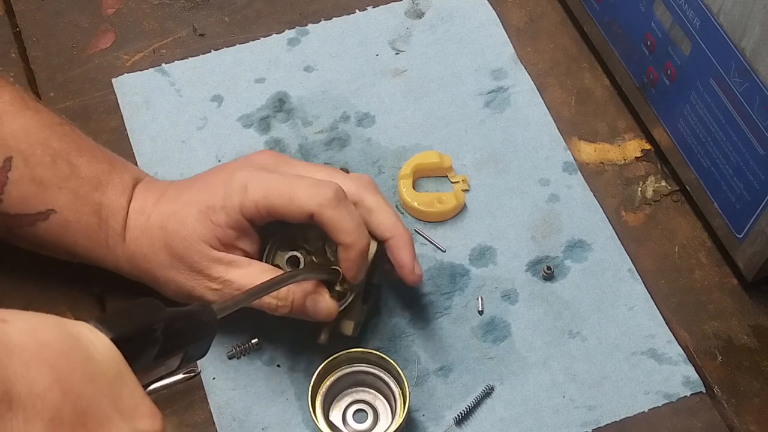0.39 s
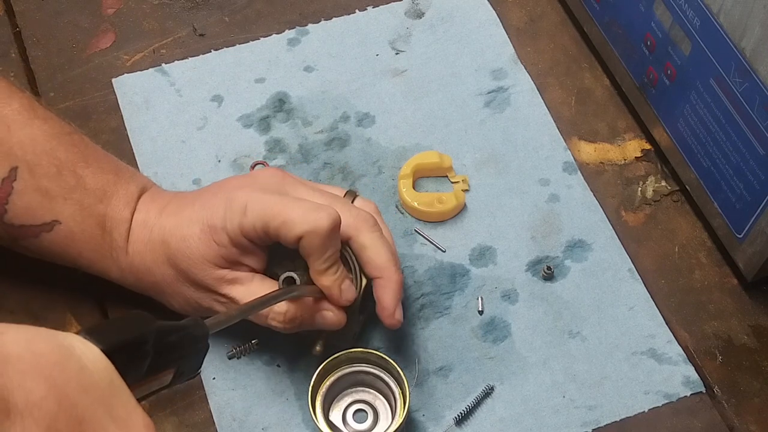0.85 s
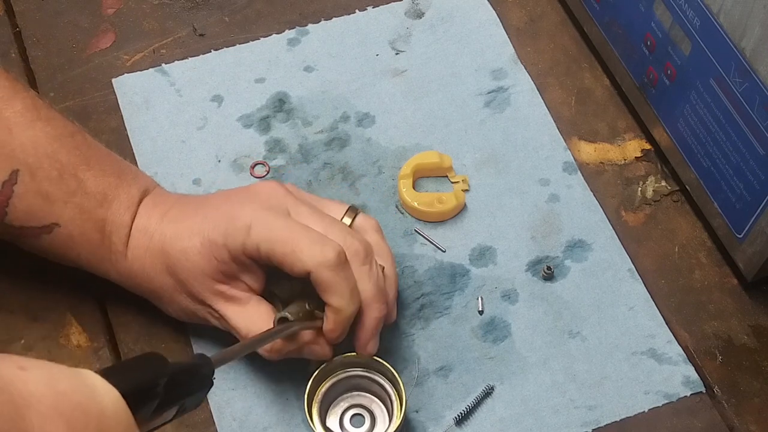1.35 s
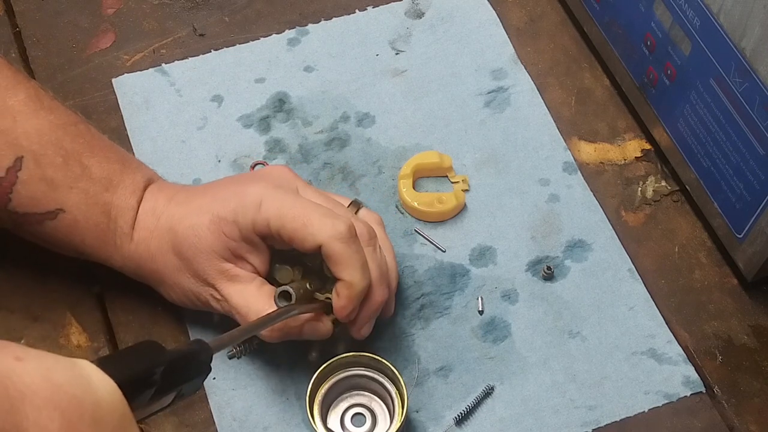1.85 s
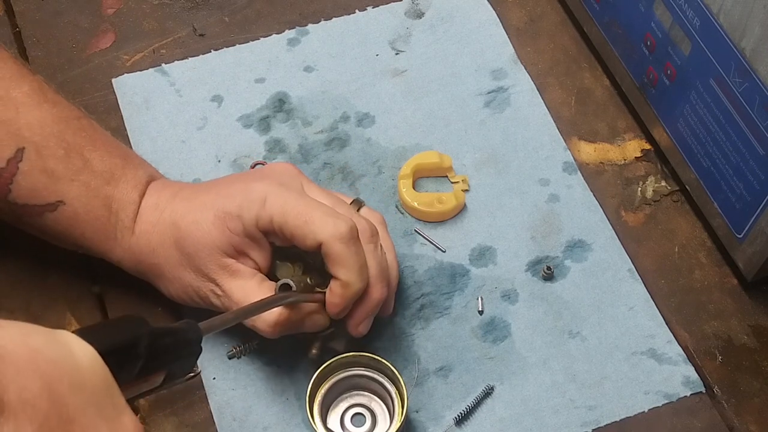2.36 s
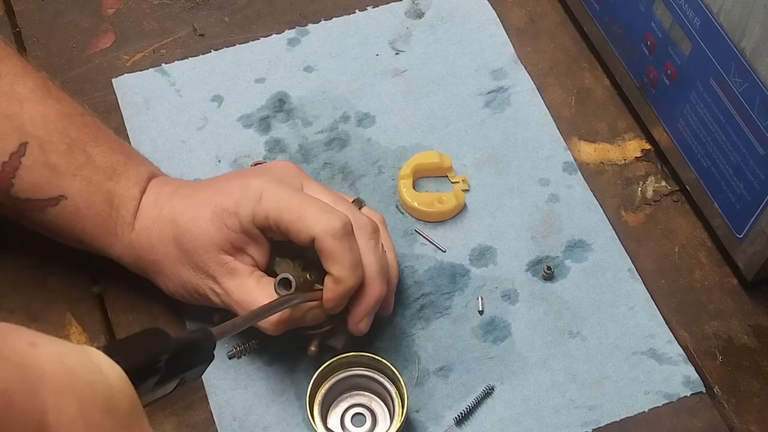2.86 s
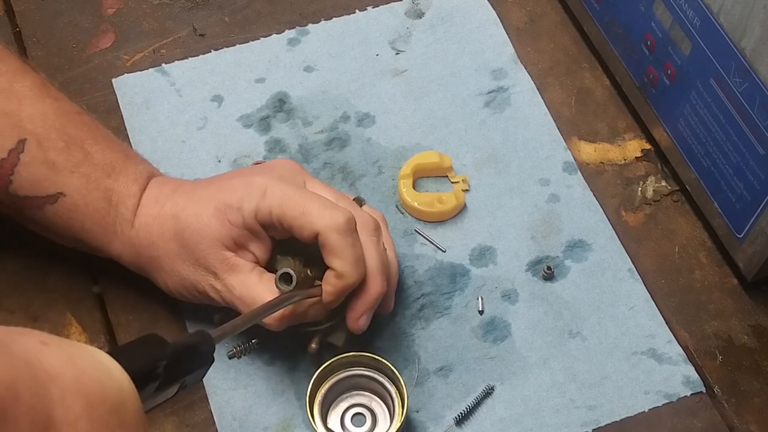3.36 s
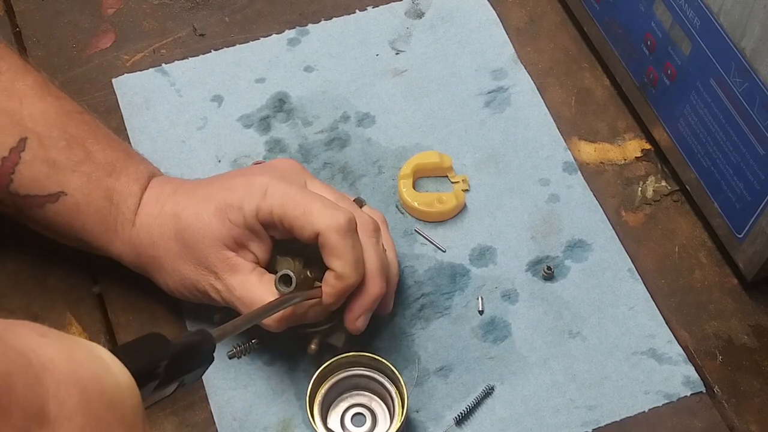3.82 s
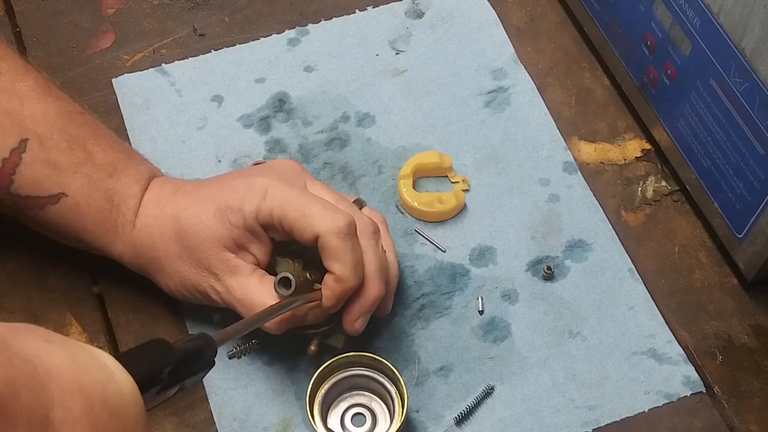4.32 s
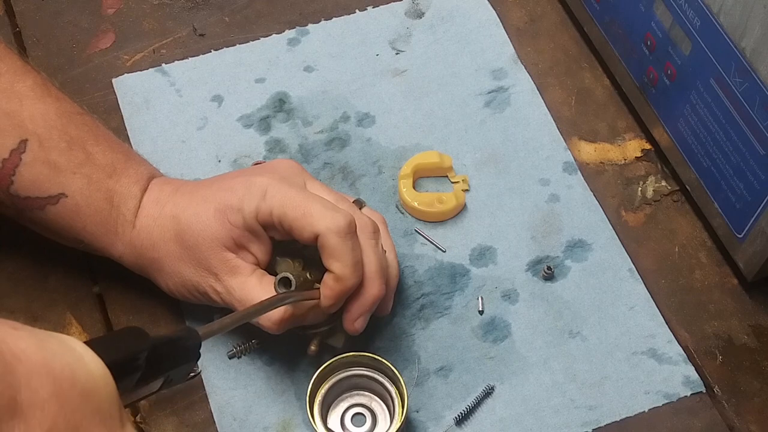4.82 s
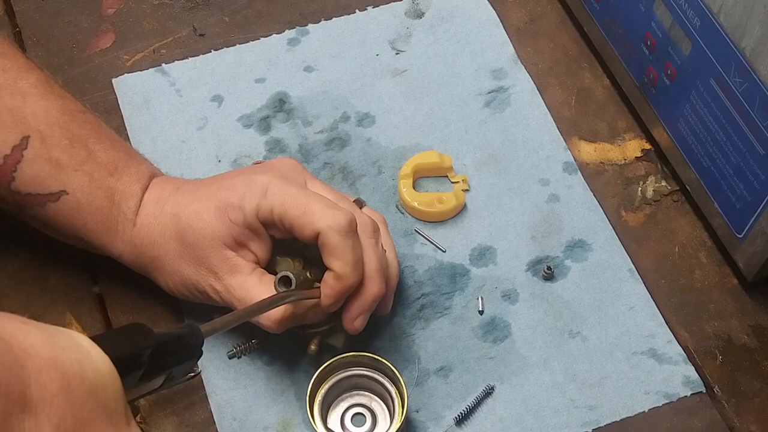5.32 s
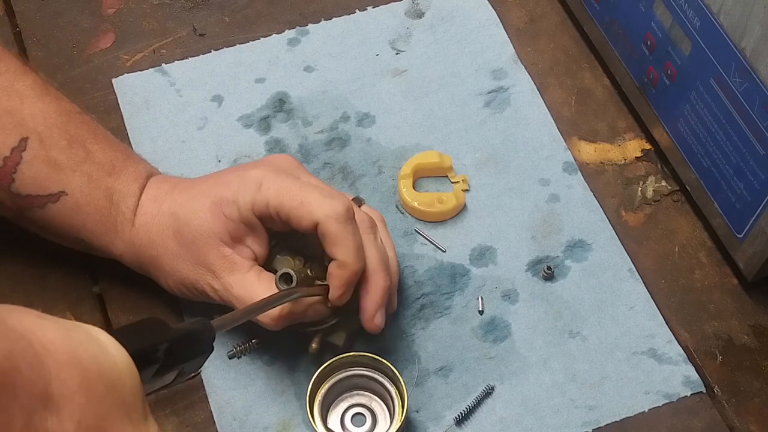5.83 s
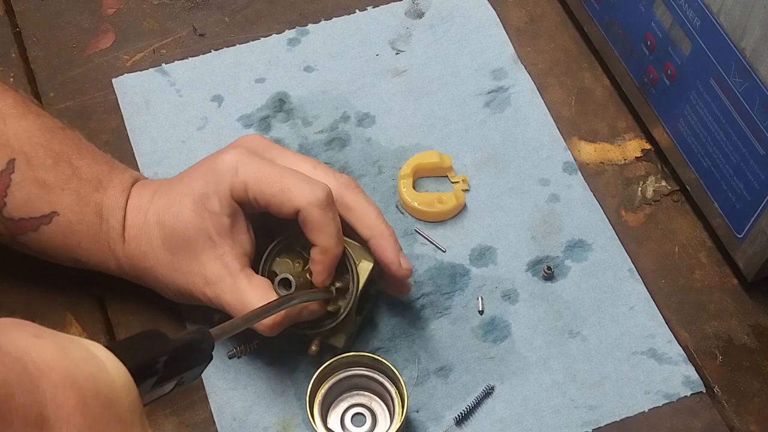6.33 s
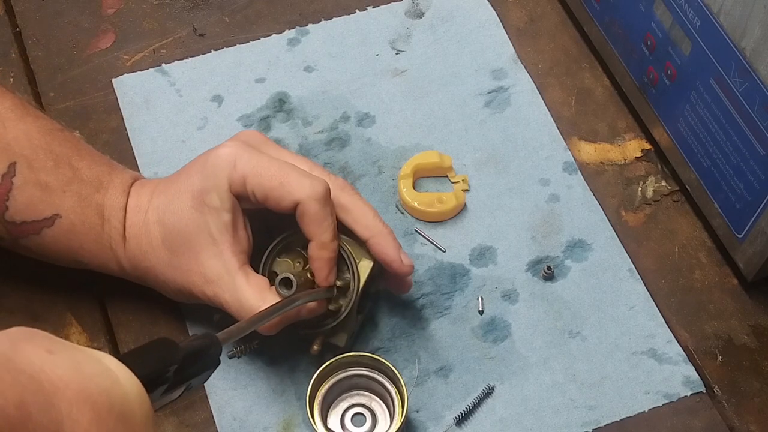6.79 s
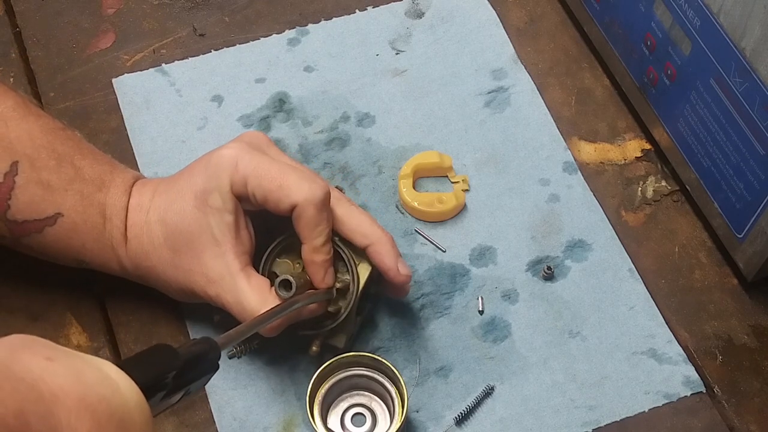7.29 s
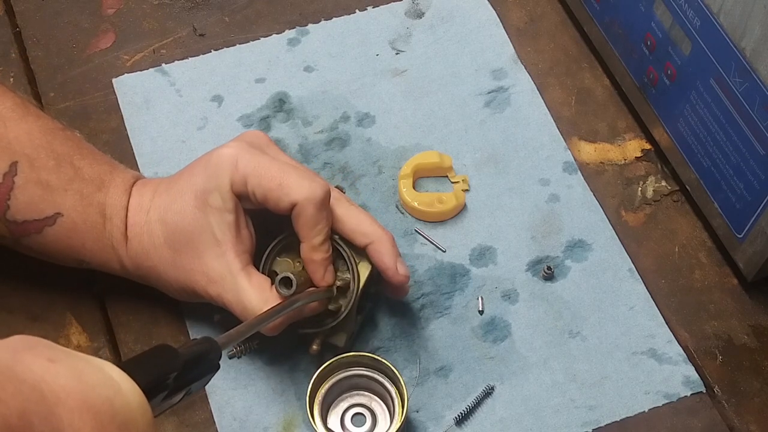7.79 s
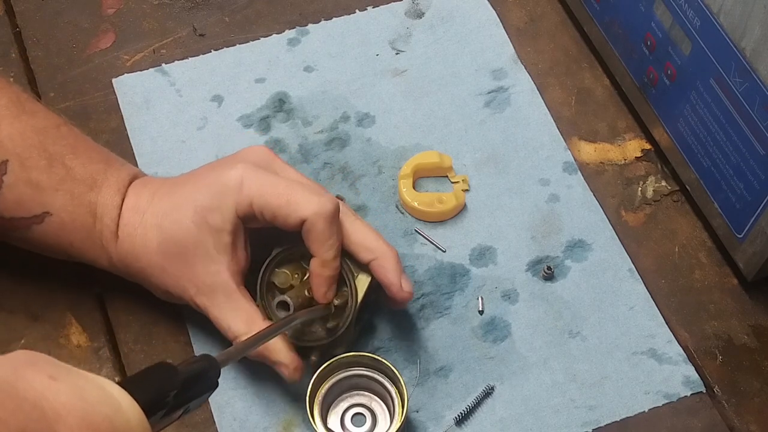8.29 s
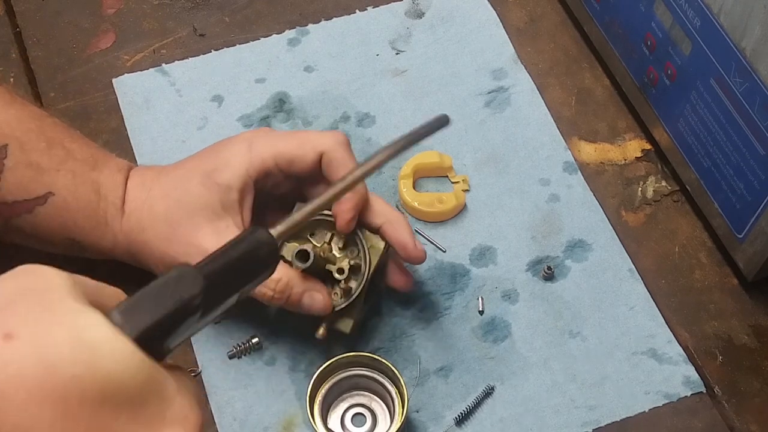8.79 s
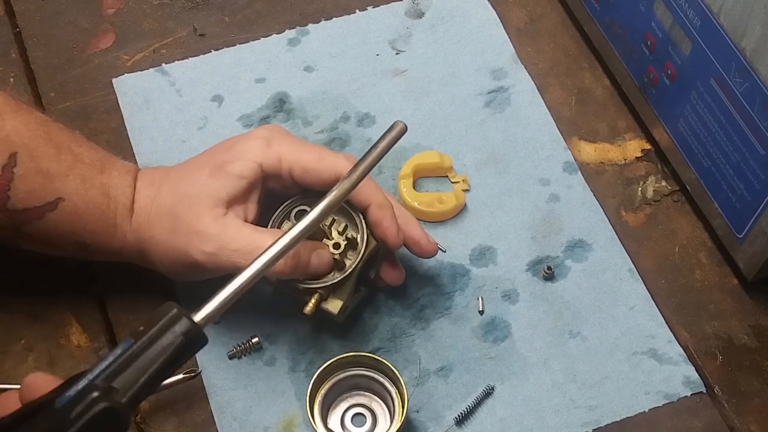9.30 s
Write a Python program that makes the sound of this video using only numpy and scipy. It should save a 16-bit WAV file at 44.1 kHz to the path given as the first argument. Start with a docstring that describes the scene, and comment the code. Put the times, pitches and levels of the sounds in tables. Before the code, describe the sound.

Repeated short bursts of compressed air, very loud and bright, sing through the passages of a metal part, each cutting off quickly into a thin leaking hiss. Gaps hold faint bench knocks and low room hum. A run of softer stepped puffs swells into a strong blast midway. The air stops near the end and the tool and part bump, tick and scrape over a paper towel. Close, dull-topped, distorted pickup in a small workshop.

```python
"""An air blow gun is pulsed into the passages of a small metal casting on a workbench.
Each trigger pull shapes resonant noise: a bright jet that sings in the passages, then a weak leak bleeding away.
Gun and casting knock (damped sines over bench modes), metal ticks (noise cracks), a paper towel rustles (grainy
noise), the workshop reverberates and hums. The loudest blasts overload a narrow-band recorder."""
import sys
import numpy as np
from scipy import signal
from scipy.fft import rfft, irfft, next_fast_len
from scipy.io import wavfile

SR = 44100
rng = np.random.default_rng(int(sys.argv[2]) if len(sys.argv) > 2 else 0)


def voltage_ratio(level):
    """Linear amplitude factor for a level in decibels (scalar or array-like)."""
    return 10 ** (np.asarray(level, float) / 20)


def dump_mix(stems):
    """Bounce the given channels to the path in sys.argv[1] as a 16-bit WAV at rate SR."""
    frames = np.atleast_2d(stems).T  # one column per channel
    limited = np.clip(frames, -1, 1)  # hard clip at full scale
    pcm = np.round(limited * 32767).astype(np.int16)
    wavfile.write(sys.argv[1], SR, pcm)


N = 425565

# trigger pulls, some squeezed in stages: start_s, let_go_s, open_db, let_go_db, opening_s
PULLS = [(-0.1, -0.002, -10, -5.5, .03), (0.856, 1.129, -3.5, -2, 0.06), (1.428, 1.695, -4.5, -2.5, .045),
         (2.505, 2.742, -4, -2, 0.035), (3.417, 3.657, -12.5, -10, 0.0245),
         (3.891, 3.94, -16.5, -13.5, 0.035), (3.93, 4.104, -15, -21, .015),
         (4.306, 4.44, -13.5, -21, 0.034), (4.434, 4.555, -21.5, -10.5, 0.013),
         (4.494, 4.68, -10, -11, 0.043), (4.597, 4.866, -5, 0.5, .11), (5.465, 5.782, -3.5, -4.5, 0.17),
         (6.479, 6.689, -5, -5, 0.055), (7.169, 7.379, -6, -5.5, 0.026), (7.642, 8.133, -7, -7.5, 0.037),
         (8.112, 8.224, -9, -13, 0.017), (8.197, 8.328, -14.5, -23.5, 0.02)]
# air seeping past the valve until the next pull has opened it:
# start_s, first_db, last_db, rise_db_per_s, roar_over_seep_db
SEEPS = [(0.788, -42, -20, 1300, -3), (0.815, -25.5, -23, 802, -21), (1.404, -26, -15.5, 1604, -16.5),
         (2.478, -30.5, -29.5, 1200, -17), (3.398, -45.5, -33, 1300, -6.5), (3.88, -53, -40, 300, 2),
         (5.21, -48.5, -22, 300, -10), (6.36, -53.5, -29.5, 300, -10.5), (7.12, -50, -20, 798, -11.5),
         (7.56, -54.5, -35, 305.5, 4), (7.614, -35, -25, 1599.5, -12)]
# trapped air bleeding out after letting go: until_s, first_db, last_db, sealing_db_per_s
BLEEDS = [(0.141, -26.5, -34, 247), (1.311, -27.5, -39, 360), (1.935, -21.5, -35.5, 285),
          (3.024, -24.5, -36.5, 316.5), (3.816, -26.5, -37.5, 316), (4.29, -24.5, -35.5, 300),
          (5.076, -25, -29.5, 141), (5.829, -30, -37.5, 350), (6.35, -40.5, -56.5, 302),
          (6.924, -32, -51, 227), (7.55, -25.5, -48.5, 597), (8.392, -30, -25, 397)]
# a drop of liquid clears from a passage: time_s, level_db
SPITS = [(2.834, -21.5), (4.09, -17), (8.378, -28)]
# hiss and roar of the blast briefly change, as if the nozzle rocked on its seat:
# centre_s, hiss_dip_db, roar_gain_db
ROCKS = [(0.93, 2, -2.5), (1.5, -2, -2), (2.545, -1.5, -2.5), (2.6, -1, 2.5), (3.476, -1, 2.5),
         (4.828, -1.5, 1.5), (7.19, -2, -5.5), (8.142, 0.5, 0.5), (4.7, 0.5, -2), (5.5, 3.5, 0),
         (5.66, 0, 0.5), (6.542, -0.5, -5), (7.328, -1.5, -2.5), (7.7, 0.5, -3), (7.972, -3.5, 0),
         (4.783, 2.5, 5.5), (4.858, 5.5, 1.5), (6.605, 0.5, 8), (6.66, 3, 8), (7.678, 0, 1)]
# roar and buffeting over the hiss, one row per nozzle placement:
# blast_roar_db, blast_buffet_db, bleed_roar_db, bleed_buffet_db
CAVITY = [(-6.5, -12, -6, -14), (-4.5, -20, -1.5, -14.5), (-5, -18, -5.5, -19.5), (-7, -18.5, -12.5, -22),
          (-7.5, -20, -6, -14.5), (-8.5, -20.5, -9.5, -12), (-6, -21.5, 2.5, -1), (-3, -14, 1.5, 0.5),
          (-13, -22.5, -2.5, -5.5), (-7.5, -14, 2, -4.5), (-7, -13.5, -16, -17.5)]
# nozzle placements: start_s, blast resonances, leak resonances (each centre_hz, width_hz, level_db)
PLACES = [ (0, [(4500, 660, -0.5)], [(2300, 450, -12), (4320, 500, 0), (6200, 300, -6.5), (7050, 300, 0)]),
          (0.76, [(1345, 230, -8.5), (2660, 140, -8), (3310, 180, -5), (4000, 190, -7), (4660, 92, -13.5),
          (5370, 110, 3), (6070, 420, -4), (7100, 340, -9)], [(2104, 340, -8), (3410, 160, -11),
          (4454, 1000, -4.5), (6600, 160, 5.5), (7190, 420, -0.5)]), (1.375, [(2376, 56, -3),
          (2620, 130, -3.5), (3050, 170, -4), (3480, 140, 2), (4170, 430, -1.5), (4450, 150, 0),
          (5010, 53, -5), (5220, 320, 0.5), (6300, 430, 2.5), (7530, 39, -16)], [(2050, 220, -4),
          (2645, 120, -2.5), (3360, 80, -4), (4610, 160, 1), (6400, 150, 2), (6600, 52, -1),
          (7160, 180, 2.5)]), (2.3, [(1636, 41, -2.5), (1886, 61, -2), (2570, 140, -12.5), (3440, 180, -3),
          (4210, 110, -2), (4510, 88, 2.5), (4750, 72, -5), (5360, 55, -5), (6240, 450, 3),
          (6870, 35, -3.5)], [(2233, 850, -6), (3190, 220, -1.5), (4510, 330, 1), (5720, 180, -6),
          (6880, 290, 0), (7100, 200, -0.5)]), (3.25, [(2130, 24, -4.5), (2430, 96, -7), (3290, 130, -19),
          (4280, 61, 2.5), (4520, 140, -6), (5470, 120, -12), (5880, 52, -16), (6270, 250, -0.5),
          (6650, 55, 3), (7390, 100, 1.5)], [(1630, 120, -3), (2030, 175, -8), (3170, 250, -16.5),
          (4500, 110, -6), (5640, 165, -2), (6060, 54, 2), (6420, 70, 1), (6820, 210, -0.5)]),
          (4.295, [(1580, 150, -9.5), (2086, 18, -4), (2300, 28, -6), (2540, 140, -16.5), (2970, 85, -20.5),
          (4130, 20, -12), (4500, 68, 6.5), (5870, 120, -6), (6650, 53, -3)], [(1900, 280, -6.5),
          (3050, 160, -16), (4280, 200, 2.5), (5840, 200, -1), (6280, 450, -2), (6700, 200, -8)]),
          (5.2, [(2090, 63, -7.5), (3110, 120, -11.5), (3770, 47, 0.5), (4470, 230, 1), (5300, 110, 0.5),
          (5690, 49, -5), (6100, 54, -4.5), (6370, 63, 2.5), (6900, 34, -6.5), (7500, 91, -12)],
          [(1970, 990, -4), (3170, 210, 1), (4220, 270, 8), (4550, 200, 4), (5760, 120, 1), (6020, 130, 7),
          (6800, 530, -4)]), (5.81, [(2165, 200, -8)], [(846, 170, -14), (2040, 240, -4.5), (2280, 150, -1),
          (3120, 140, -16), (4120, 400, -4), (6100, 200, -18)]), (6.42, [(1363, 280, -12.5),
          (1990, 73, -14.5), (3620, 440, -1.5), (4340, 210, -1), (5140, 510, -0.5), (6250, 640, 2.5)],
          [(1607, 120, -6.5), (2950, 130, -4.5), (3670, 160, -6), (4420, 38, -6), (6700, 87, -6.5)]),
          (7.055, [(1350, 16, 0.5), (1545, 120, -2.5), (2280, 140, -8.5), (3460, 91, 0), (4150, 200, -3),
          (5100, 170, -7.5), (5660, 91, 3), (6320, 38, -5.5), (6730, 81, -2.5), (7500, 58, -7.5)],
          [(1280, 65, -10.5), (1746, 43, -6.5), (3780, 50, -3), (5400, 36, -19), (5630, 52, -14.5),
          (6650, 180, -5)]), (7.555, [(1400, 290, -6), (2250, 37, -17), (3100, 230, -5.5),
          (3500, 150, -3.5), (4150, 390, -3.5), (5070, 130, -4.5), (5770, 250, 2.5), (6520, 53, 4),
          (7320, 67, -5), (7800, 200, -1)], [(1360, 270, -15), (3530, 90, -1.5), (4180, 140, 0),
          (5250, 66, 6.5), (6620, 83, 7.5), (7000, 280, 2.5)])]
# broad colour of the full blast: freq_hz, density_db_per_hz
BLAST_COLOUR = [(30, -36), (60, -5.5), (250, -4), (560, -1.5), (900, -12), (1300, -6.5), (2200, -10),
                (2900, -9.5), (4500, -3), (6300, 0), (7500, -1), (12000, -8.5)]
# broad colour of the weak leak: freq_hz, density_db_per_hz
LEAK_COLOUR = [(30, -33), (60, -14), (300, -7.5), (700, -12), (1200, -12.5), (2200, -10), (3000, -9.5),
               (4500, -6.5), (5300, -7), (7000, -8), (12000, -10.5)]
# knocks of gun and casting: time_s, thud_db, pitch_hz, length_cycles (to -60 dB), ring_under_thud_db
KNOCKS = [(0.1643, 3.5, 726, 1.35, -45), (0.1662, 0, 82.5, 1.2, -36), (0.206, -27, 74.5, 8.0, -17),
          (0.291, -20, 74, 4.3, -14), (0.366, -29, 70, 8.5, -10), (0.469, -24, 95, 3.4, -16),
          (2.212, -10.5, 259, 7.3, -7.5), (2.2141, -6, 1146, 8.1, -18), (3.238, -30, 70, 7.2, -19.5),
          (3.4432, -8.5, 507, 14, -13.5), (5.9584, -11, 336, 2.2, -25), (6.58, 8.5, 497, 1.4, -23),
          (6.66, -1.5, 595, 6.1, -14.5), (7.365, -13, 805, 4.5, -1.5), (8.446, 4, 330, 9.2, -17.5),
          (8.4504, 9.5, 245, 2.8, -17), (8.583, -17, 2500, 50.0, -36), (8.612, -16, 2450, 50.0, -34),
          (8.617, -12, 5830, 90.0, -23), (8.66, -16, 200, 4.9, -7.5), (8.679, -26, 1600, 32, -17),
          (8.8059, -19, 388, 6.0, -9), (8.8103, -11, 415, 6.2, -13.5), (8.905, -24, 151, 6.3, -1),
          (9.01, 2, 326, 3.8, -34), (9.0158, 3.5, 457, 8.2, -17.5), (9.037, -17, 400, 6.8, -6),
          (9.07, -30, 500, 6.0, -14), (9.091, -10, 402, 3.2, -21), (9.17, -24, 280, 4.6, -13),
          (9.194, -38, 600, 2.7, -4), (9.248, -23.5, 190, 12, -4), (9.271, -29, 500, 3.3, -26)]
# bench and casting modes: freq_hz, level_db, t60_s
BENCH_MODES = [(66.4, -7, 0.17), (95, 5.5, 0.19), (136.1, 8, 0.27), (162.2, 6.5, 0.64), (200, 6.5, 0.088),
               (235, 3.5, 0.39), (240.4, -9.5, 0.13), (288, -3, 0.38), (373, 1.5, 0.082),
               (397.6, 4.5, 0.24), (398, -2, 0.38), (500, 1.5, 0.27), (635, -9.5, 0.08), (787, -2, 0.069),
               (890, 0.5, 0.11), (1280, -5.5, .25)]
# sharp ticks of metal on metal: time_s, level_db
TICKS = [(0.163, -39), (2.212, -16.5), (3.4434, -4), (5.9573, -27.5), (7.365, 1.5), (8.4448, -18.5),
         (8.582, -35), (8.614, -36), (8.66, -34), (8.704, -29), (8.8058, -38), (9.017, -32), (9.067, -36),
         (9.091, -36), (9.194, -28.5), (9.271, -31)]
# hand and casting sliding on the towel: start_s, end_s, first_db, last_db, scuff_over_paper_db
SLIDES = [(0.217, 0.5, -59.5, -60.5, 3), (0.65, 0.739, -68, -66, 12), (8.42, 8.572, -41.5, -37, -3.5),
          (8.585, 8.605, -21, -24, -11), (8.604, 8.645, -23.5, -31.5, -9.5), (8.637, 8.7, -30, -34.5, -6),
          (8.72, 8.788, -40, -49, -0.5), (8.79, 9.003, -55, -56, 8), (9.01, 9.146, -49, -41, 4),
          (9.174, 9.39, -43, -49, 3.5), (9.39, 9.5, -48, -49, 5), (9.506, 9.638, -49.5, -45, 4.5)]
# paper friction colour: freq_hz, density_db_per_hz
TOWEL_COLOUR = [(530, -66), (900, -28), (1220, -23), (1620, -10), (2010, -1), (2510, 3.5), (2800, 2.5),
                (4220, 11.5), (5180, 9), (5710, 7), (6190, 8), (7080, 6), (7600, 3.5), (9880, -39.5),
                (16700, -120)]
# casting singing as it slides: centre_hz, width_hz, level_db
SLIDE_RING = [(1600, 280, -6.5), (2500, 290, 5.5), (4950, 320, 8.5), (5900, 250, 8)]
# workshop background colour: freq_hz, density_db_per_hz
HUM_COLOUR = [(15, -35.5), (25, -6.5), (76, -4.5), (146, -13), (308, -14), (364, -19), (699, -26),
              (808, -29.5), (1000, -29.5), (1750, -34.5), (2570, -36), (7260, -41.5), (8000, -45),
              (10400, -77), (17600, -120)]
# upper band edge of the recorder: freq_hz, gain_db
BAND_END = [(7200, 0.5), (7600, 1), (8000, -8.5), (8400, -20.5), (8800, -78), (9500, -110)]

SHUT_S, ROCK_S = 0.03, 0.02
HISS_POWER, ROAR_POWER = 1.2, 1   # exponents on valve opening; the roar closes with HISS_POWER
HANDOVER_DB_PER_S = 800.5   # a seep dies under the blast, a bleed emerges from it
SPIT_RISE_DB_PER_S, SPIT_FALL_DB_PER_S = 253, 899
SEEP_BUFFET_DB, SPIT_ROAR_DB = -23, -8.5   # over the hiss
SLIDE_START_DB_PER_S, SLIDE_STOP_DB_PER_S = 1197.5, 300.5
SHOP_T60_S, SHOP_DB = 0.38, -18.5
KNOCK_SEND_DB = -1.5   # handling on the bench reaches the room less than the jet does
HUM_DB = -47.5
MIC_LOW_HZ = 49.3


def jet(flutter_db=0.86, choke_db=-24):
    """Turbulent jet: buffeting, cavity roar and hiss; strong flow and weak leak sound different passages."""
    flow = airflow()
    noise, out, t = white(grain_db=2.0), np.zeros(N), np.arange(N) / SR
    gains = [gain * voltage_ratio(flutter_db * drift(36)) for gain in flow]
    hiss_db = 20 * np.log10(flow[-1] + 1e-9)
    strong = 1 / (1.5 + np.exp(np.minimum((choke_db - hiss_db) / 2, 100)))   # blast share, at most 2/3
    ends_s = [place[0] for place in PLACES[1:]] + [N / SR + 1]
    for (start_s, blast_peaks, leak_peaks), end_s in zip(PLACES, ends_s):
        blast = bands(*coloured(noise, BLAST_COLOUR, blast_peaks, lift_db=2.5), edges_hz=(1050, 2600))
        leak = bands(*coloured(noise, LEAK_COLOUR, leak_peaks, lift_db=0.5), edges_hz=(1050, 2600))
        here = (t >= start_s) & (t < end_s)
        for gain, blast_band, leak_band in zip(gains, blast, leak):
            out += here * gain * (strong * blast_band + (1 - strong) * leak_band)
    return out


def airflow():
    """Gains of buffeting, roar and hiss: blast, seep or spit, and bleed add as powers."""
    t = np.arange(N) / SR
    start, shut, first_db, last_db, opening = np.transpose(PULLS)[:, :, None]

    valve = np.clip(np.minimum((t - start) / opening, 1 - (t - shut) / SHUT_S), 0, 1)
    held = np.clip((t - start - opening) / (shut - start - opening), 0, 1)
    full = voltage_ratio(first_db + (last_db - first_db) * held)
    roar_valve = np.where(t > shut, valve ** HISS_POWER, valve ** ROAR_POWER)
    blast = (full * valve ** HISS_POWER).max(axis=0)
    hollow = (full * roar_valve).max(axis=0)

    thin_db = []
    for s, *db, rise, _ in SEEPS:
        next_open = (start + opening)[start > s][0]
        thin_db.append(in_time(s, next_open, *db, rise, HANDOVER_DB_PER_S))
    for s, db in SPITS:
        thin_db.append(in_time(s, s, db, db, SPIT_RISE_DB_PER_S, SPIT_FALL_DB_PER_S))
    thin = voltage_ratio(np.max(thin_db, axis=0))
    thin_roar_db = np.append(np.transpose(SEEPS)[-1], [SPIT_ROAR_DB] * len(SPITS))
    thin_roar = voltage_ratio(thin_roar_db)[np.argmax(thin_db, axis=0)]

    bleed_db = []
    for s, *db, seal in BLEEDS:
        last_shut = shut[shut < s][-1]
        bleed_db.append(in_time(last_shut, s, *db, HANDOVER_DB_PER_S, seal))
    bleed = voltage_ratio(np.max(bleed_db, axis=0))

    dip_db, gain_db = sum(np.outer(change_db, np.exp(-((t - s) / ROCK_S) ** 2)) for s, *change_db in ROCKS)
    hollow = hollow * voltage_ratio(gain_db)
    place = np.searchsorted([place[0] for place in PLACES], t, "right") - 1
    blast_roar, blast_buffet, bleed_roar, bleed_buffet = voltage_ratio(np.transpose(CAVITY))[:, place]

    hiss = np.linalg.norm([blast * voltage_ratio(-dip_db), thin, bleed], axis=0)
    roar = np.linalg.norm([hollow * blast_roar, thin * thin_roar, bleed * bleed_roar], axis=0)
    buffet = np.linalg.norm([hollow * blast_buffet, thin * voltage_ratio(SEEP_BUFFET_DB), bleed * bleed_buffet], axis=0)
    return buffet, roar, hiss


def knocks(rattle_db=-8, rattle_t60_s=0.27):
    """Each blow is a quickly damped thud; bench modes near its pitch and loose parts sound on beneath."""
    out, t = np.zeros(N), np.arange(SR // 2) / SR
    hz, level_db, t60_s = np.transpose(BENCH_MODES)[:, :, None]
    luck = rng.standard_normal((len(KNOCKS), 2, len(BENCH_MODES), 1))
    noise = rng.standard_normal((len(KNOCKS), len(t)))
    rattle_band = signal.butter(3, [110, 750], "band", fs=SR, output="sos")
    rattles = signal.sosfilt(rattle_band, signal.lfilter([1], [1, -.96], noise))
    for (s, thud_db, pitch_hz, cycles, ring_db), (size, phase), rattle in zip(KNOCKS, luck, rattles):
        thud = -np.sin(2 * np.pi * pitch_hz * t) * voltage_ratio(-60 * t * pitch_hz / max(cycles, 1))
        thud *= 1 - np.exp(-t / 0.00041)
        reach_db = -7 * np.abs(np.log2(hz / pitch_hz))   # modes far in pitch are struck less
        modes = voltage_ratio(level_db + reach_db + 1.3 * size - 60 * t / t60_s)
        rings = (modes * np.sin(2 * np.pi * hz * t + np.pi * phase)).sum(axis=0)
        after = rings / np.abs(rings).max() + voltage_ratio(rattle_db - 60 * t / rattle_t60_s) * rms_one(rattle)
        after *= 1 - np.exp(-t * pitch_hz)   # the bench takes a cycle to get going
        at = round(s * SR)
        out[at:at + len(t)] += (voltage_ratio(thud_db) * (thud + voltage_ratio(ring_db) * after))[:N - at]
    return out


def ticks(t60_s=0.022):
    """Each tick is a crack of band-passed noise that dies at once."""
    out, t = np.zeros(N), np.arange(SR // 20) / SR
    crack_band = signal.butter(1, [600, 2500], "band", fs=SR, output="sos")
    cracks = signal.sosfilt(crack_band, rng.standard_normal((len(TICKS), len(t))))
    for (s, db), crack in zip(TICKS, cracks):
        out[round(s * SR):][:len(t)] += voltage_ratio(db - 60 * t / t60_s) * rms_one(crack)
    return out


def rustle():
    """Grainy friction on paper, with a dull scuff carried by the bench."""
    slides_db = np.array([in_time(*slide[:4], SLIDE_START_DB_PER_S, SLIDE_STOP_DB_PER_S) for slide in SLIDES])
    scuff_db = np.transpose(SLIDES)[-1][slides_db.argmax(axis=0)]
    shaped, hz = coloured(white(grain_db=4.0), TOWEL_COLOUR, SLIDE_RING)
    scuff, paper = bands(shaped / (1 + (120 / hz) ** 4), hz, edges_hz=(600,))
    return voltage_ratio(slides_db.max(axis=0) + 1.2 * drift(60)) * (paper + voltage_ratio(scuff_db) * scuff)


def shop(x):
    """Diffuse tail: noise dying at the reverberation rate, starting after 8 ms."""
    t = np.arange(SR // 2) / SR
    tail = rng.standard_normal(len(t)) * voltage_ratio(-60 * t / SHOP_T60_S) * (t > .008)
    return signal.fftconvolve(x, tail / np.sqrt(np.sum(tail ** 2)))[:N]


def hum():
    """Continuous bass-heavy workshop noise whose level drifts slightly."""
    shaped, hz = coloured(white(grain_db=-5.0), HUM_COLOUR)
    background = rms_one(irfft(shaped / (1 + (30 / hz) ** 4))[:N])
    return voltage_ratio(HUM_DB + 0.8 * drift(9.6)) * background


def rms_one(x):
    """Scale to unit rms."""
    return x / np.sqrt(np.mean(x ** 2) + 1e-20)


def in_time(start_s, end_s, first_db, last_db, rise_db_per_s, fall_db_per_s):
    """Level in dB of one event: steady rise, straight line from first to last, steady fall."""
    t = np.arange(N) / SR
    hold_db = np.interp(t, [start_s, max(end_s, start_s + 1 / SR)], [first_db, last_db])
    return hold_db - rise_db_per_s * np.maximum(start_s - t, 0) - fall_db_per_s * np.maximum(t - end_s, 0)


def drift(rate_hz):
    """Random drift of unit rms: noise at 200 knots a second through a two-pole low-pass."""
    knots = rng.standard_normal(int(N / SR * 200) + 400)
    pole = np.exp(-2 * np.pi * rate_hz / 200)
    slow = signal.lfilter([1], [1, -2 * pole, pole * pole], knots)[398:]
    return np.interp(np.arange(N) / SR * 200, np.arange(len(slow)), rms_one(slow))


def white(grain_db):
    """Spectrum of white noise whose samples vary in size."""
    size = 2 * next_fast_len(N // 2 + 1, True)
    grain = voltage_ratio(grain_db * np.minimum(rng.exponential(1, size), 4))
    return rfft(rng.standard_normal(size) * grain)


def coloured(spectrum, colour, peaks=(), lift_db=0):
    """Shape a spectrum by a broad colour with resonances standing on it; also return its Hz axis."""
    hz = np.arange(len(spectrum)) * SR / (2 * len(spectrum) - 2) + 1   # 1 Hz up, so the log is finite
    points = np.array(colour)
    power = voltage_ratio(np.interp(np.log(hz), np.log(points[:, 0]), points[:, 1])) ** 2
    for centre_hz, width_hz, level_db in peaks:
        power = power + voltage_ratio(level_db + lift_db) ** 2 / (1 + (2 * (hz - centre_hz) / width_hz) ** 4)
    return spectrum * np.sqrt(power), hz


def bands(shaped, hz, edges_hz):
    """Split a spectrum at soft edges into signals of unit rms."""
    below = [1 / (1 + (hz / edge) ** 8) for edge in edges_hz] + [1]
    shares = [upper - lower for lower, upper in zip([0] + below, below)]
    return [rms_one(irfft(shaped * np.sqrt(np.maximum(share, 0)))[:N]) for share in shares]


def cut(x, edge):
    """Remove the treble above a band edge without shifting phase."""
    shaped, _ = coloured(rfft(x[0], 2 * next_fast_len(N // 2 + 1, True)), edge)
    return irfft(shaped)[None, :N]


def scene():
    """Gun, casting and towel close by, the workshop around them."""
    air = jet()
    handling = knocks() + ticks() + rustle()
    room = voltage_ratio(SHOP_DB) * shop(air + voltage_ratio(KNOCK_SEND_DB) * handling)
    return (air + handling + room + hum())[None]


def band_limit(x):
    """A steep low-pass at the top of the band."""
    return signal.sosfilt(signal.butter(12, 15800, fs=SR, output="sos"), x)


def record(dry):
    """The input stage saturates, the band ends near 8 kHz, and the peaks left over hit full scale."""
    low_cut = signal.butter(3, MIC_LOW_HZ, "high", fs=SR, output="sos")
    thin = signal.sosfilt(low_cut, dry)
    rounded = 1.111 * np.tanh(thin / 1.534)
    clipped = np.clip(cut(rounded, BAND_END), -1, 1)
    return band_limit(clipped)


dry = scene()
out = record(dry)
dump_mix(out)
```